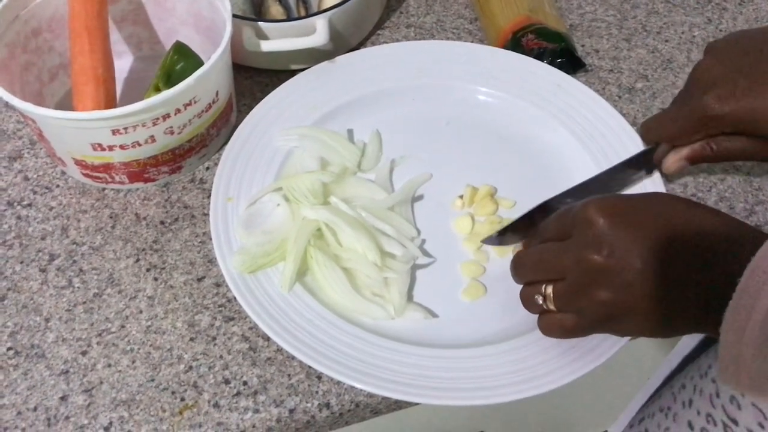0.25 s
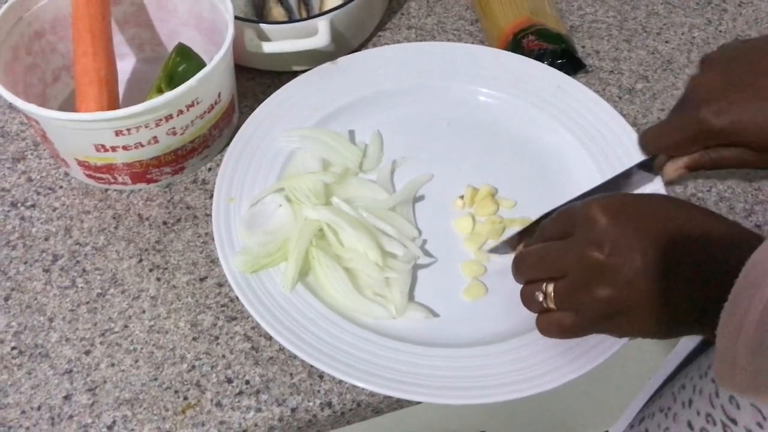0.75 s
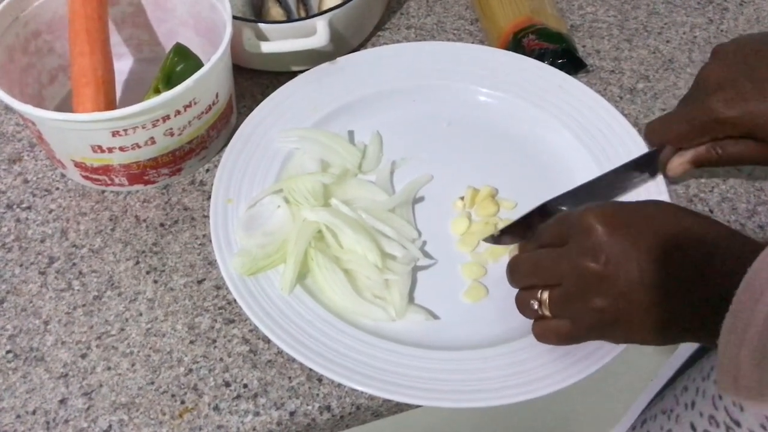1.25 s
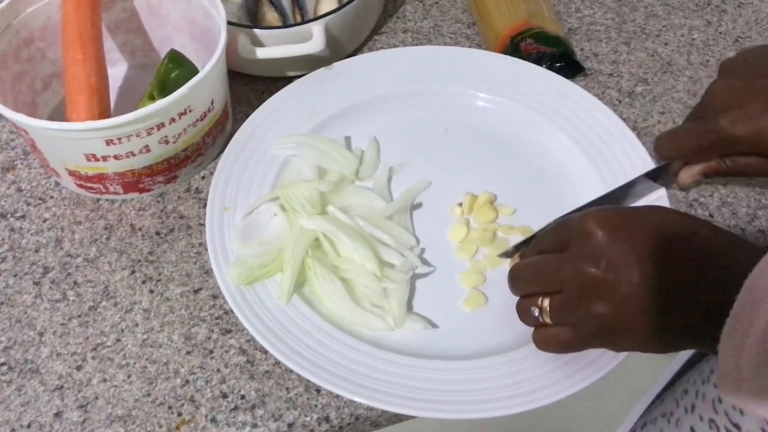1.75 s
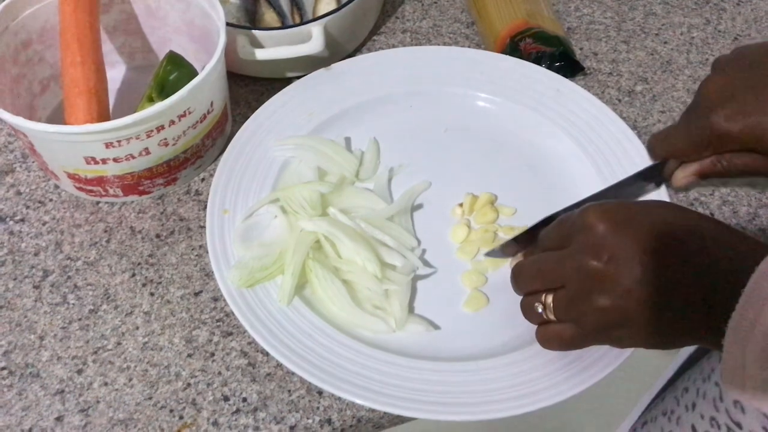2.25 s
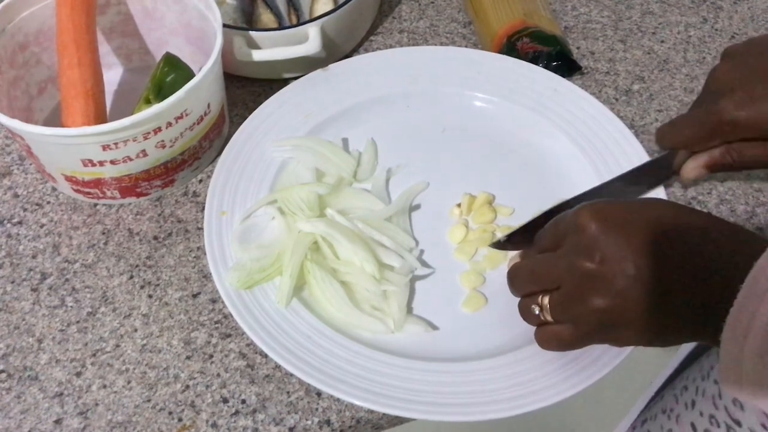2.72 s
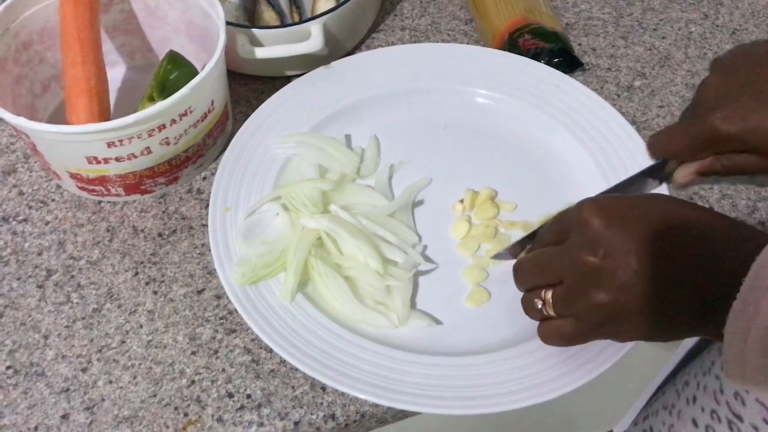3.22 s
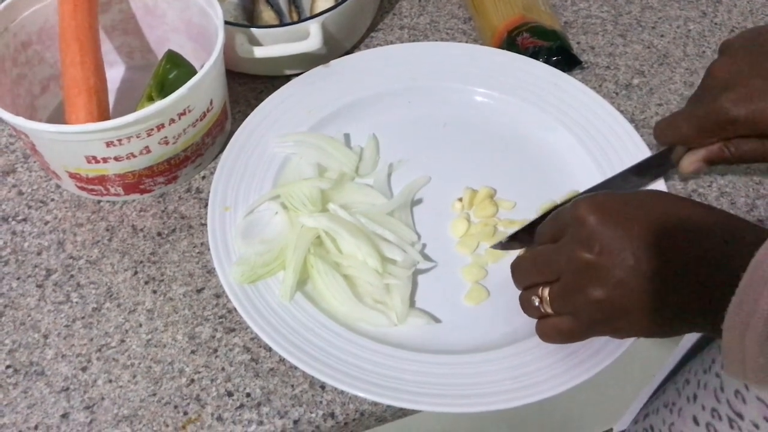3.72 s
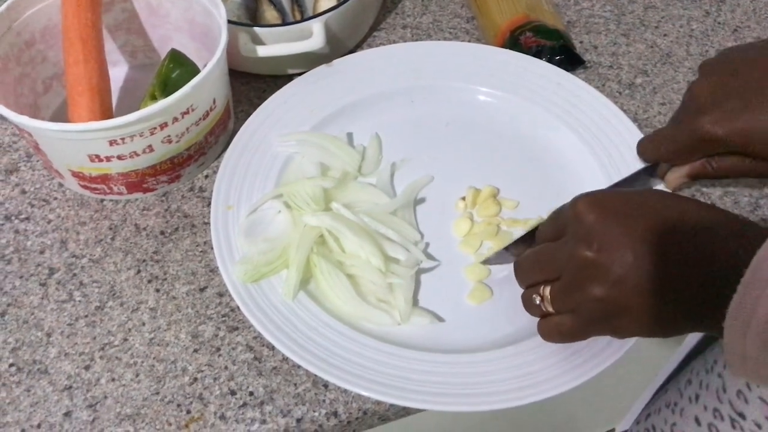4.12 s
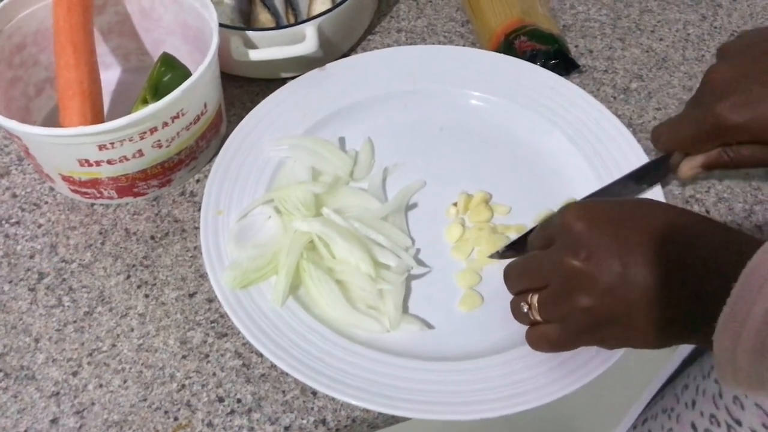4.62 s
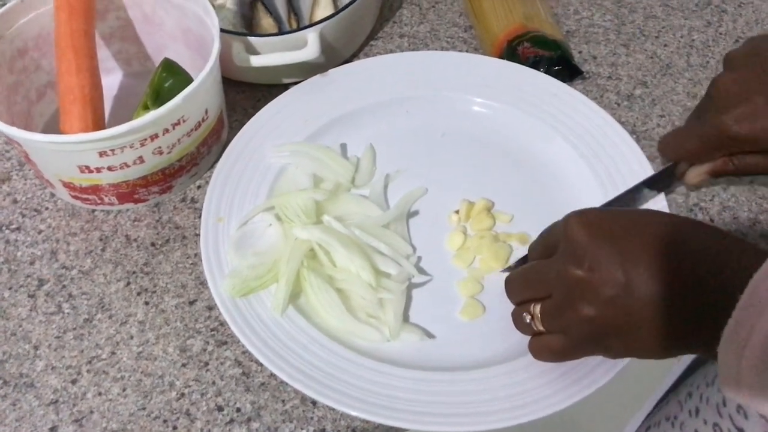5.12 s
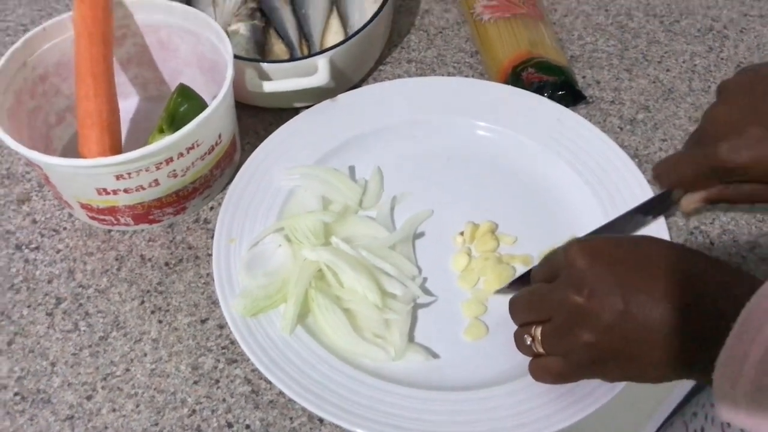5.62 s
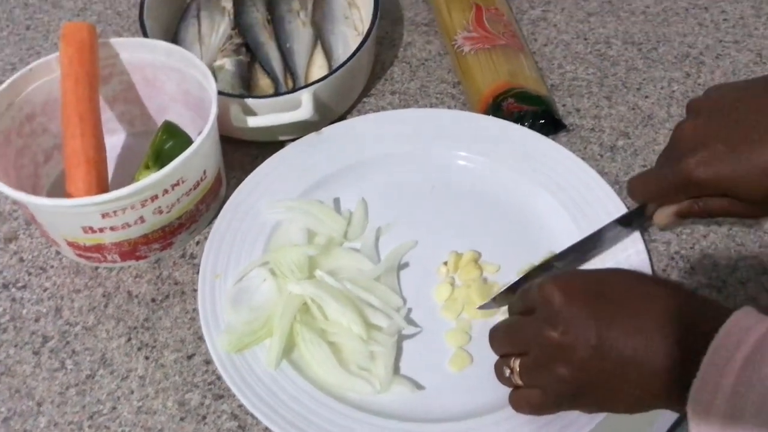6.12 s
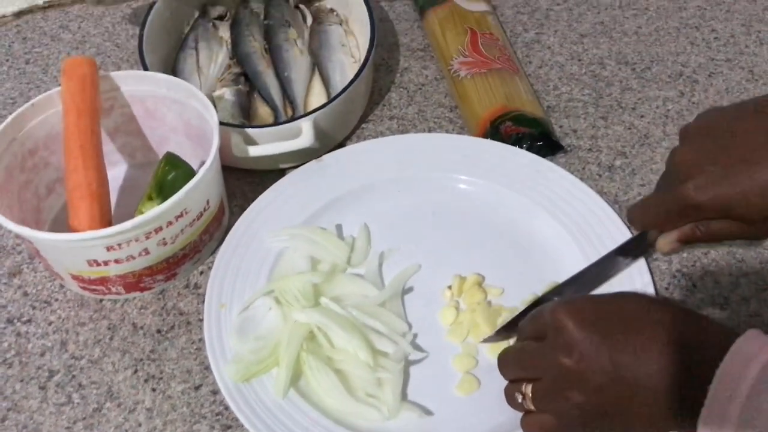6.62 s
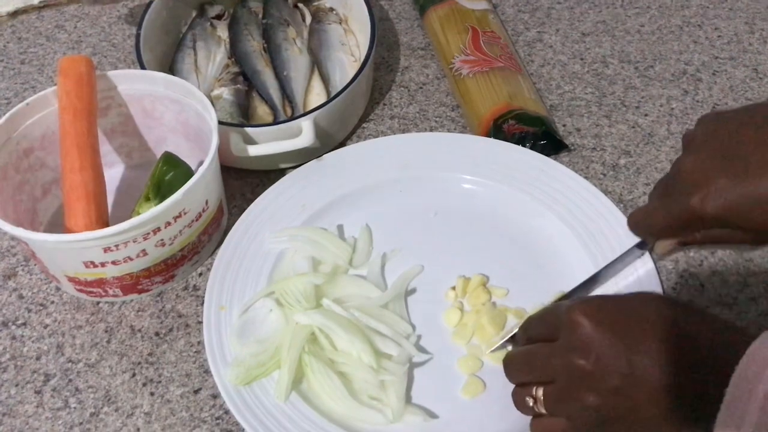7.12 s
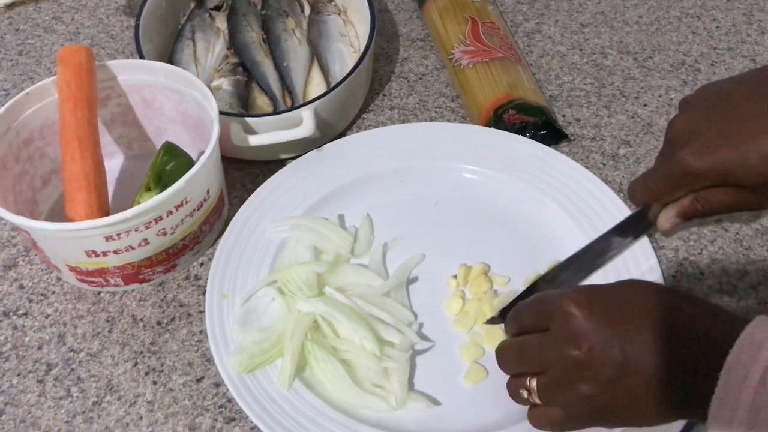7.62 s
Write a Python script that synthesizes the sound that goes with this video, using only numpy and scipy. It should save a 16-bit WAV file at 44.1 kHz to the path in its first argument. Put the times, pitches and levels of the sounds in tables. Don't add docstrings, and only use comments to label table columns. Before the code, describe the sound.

Spaced hard clinks of a blade striking a ceramic plate, soft garlic crunches before each, over low handling rumble and faint hiss.

```python
import sys
import numpy as np
from scipy import signal
from scipy.fft import rfft, irfft, next_fast_len
from scipy.io import wavfile
from scipy.ndimage import uniform_filter1d, map_coordinates

SR = 44100
rng = np.random.default_rng(int(sys.argv[2]) if len(sys.argv) > 2 else 0)


def gain_from_db(level_db):
    decades = np.asarray(level_db, float) / 20
    return 10 ** decades


def output_pcm(signal):
    pcm = np.clip(np.atleast_2d(signal).T, -1, 1) * 32767
    wavfile.write(sys.argv[1], SR, np.round(pcm).astype(np.int16))


N = 346626
LEAD = SR // 2


# start_s, peak_db, body_modes_db, top_over_high_modes_db (set by the spot struck)
BLOWS = [
    (0.6254, -14, 3, 3.5),
    (1.537, -8, -1.5, 3),
    (2.3448, -6, -1.5, 1),
    (3.0761, -11, 2, -5.5),
    (4.0453, -10.5, -0.9, -2),
    (4.8739, -7, -6.5, -10),
    (5.8146, -8, -3.5, -7.5),
    (6.81, -9.5, -2.5, 6.5),
]
# start_s, peak_db, body_modes_db, top_over_high_modes_db
EARLIER_BLOW = (-0.3921, -4, 0, 2)
# frequency_hz, level_db
CRACK = [(100, -14.5), (270, 4), (540, -17), (900, -2), (1350, -18.5), (4000, -11), (9000, -10.5),
         (13200, -5), (15000, -14.5), (16500, -13.5)]


def blows():
    near, far = np.zeros(LEAD + N), np.zeros(LEAD + N)
    t = np.arange(SR // 4) / SR
    for start_s, peak_db, body_db, spot_db in [EARLIER_BLOW, *BLOWS]:
        middle_db = 0.9 * body_db + 1.4
        high_db, top_db = -2 - spot_db / 2, 1 + spot_db / 2
        modes = ring([body_db, middle_db, 0, high_db, top_db], scatter_db=1.85)
        crack = gain_from_db(-9.5 - 60 * t / 0.027) * noise(CRACK, size=len(t))
        landing = (1 - np.exp(-t / 0.0005)) ** 2
        pressed = 0.29 + 0.46 / (1 + (t / 0.024) ** 4)
        hit = gain_from_db(peak_db - 2.5) * (modes + crack) * landing * pressed
        add(near, start_s - 0.0003, hit[0])
        to_walls = gain_from_db(1.5 - 60 * t / 0.17) * hit[1] + gain_from_db(peak_db - 14) * crack * landing
        add(far, start_s, echo(np.pad(to_walls, (0, SR))))
    return (near + gain_from_db(-6) * far)[LEAD:]


PLATE_HZ = [265, 410, 670, 800, 972, 1270, 1745, 1810, 2375, 2500, 2740, 2870, 3090, 3840, 4190, 4880, 6022,
            6100, 6268, 7628, 8210, 8550, 9045, 9272, 10530, 11545, 12216, 13050, 13480, 14078]
# level_to_camera_db, t60_s, extra_to_walls_db
PLATE = [(-21.5, 0.032, 5.5), (-15.5, .035, -0.5), (-20.5, 0.11, 3), (-16, 0.036, 7.5), (-9, 0.036, 1.5),
         (-32, 0.028, 5), (-9.5, 0.11, 4.5), (-23.5, 0.51, 3.5), (-13, .04, 2.5), (-17, 0.082, 2),
         (-20, 0.024, -5), (-5, 0.024, 3.3), (1.5, 0.039, -8.5), (-28, .07, 5.3), (-12, 0.035, -2.6),
         (-23.5, 0.067, -0.1), (-5, .08, -4.5), (-20.5, 0.14, 6), (-5, 0.065, -10), (-15.5, 0.15, -8.5),
         (5.5, 0.019, -9.5), (-14.5, 0.13, -1.9), (-17.5, .1, -4.5), (-18.5, .04, -6.5), (-15, 0.13, -7),
         (-4, 0.027, -4.5), (-11.5, 0.035, -2), (-8.5, 0.016, 2.5), (-14.5, .06, 2), (-17.5, 0.051, 0.3)]


def ring(group_db, scatter_db):
    t = np.arange(SR // 4) / SR
    hz = np.array(PLATE_HZ)[:, None]
    level_db, t60_s, wall_db = np.transpose(PLATE)[:, :, None]
    group = np.asarray(group_db)[np.searchsorted([2100, 5000, 10000, 12500], hz)]
    struck_db = level_db + group + scatter_db * rng.standard_normal(hz.shape)
    modes = gain_from_db(struck_db - 60 * t / t60_s) * np.sin(2 * np.pi * hz * t)
    return np.array([modes.sum(0), (gain_from_db(wall_db) * modes).sum(0)])


# frequency_hz, t60_s
KITCHEN = [(200, 1), (600, 0.81), (1800, 0.78), (3500, 0.74), (6000, 0.61), (10000, 0.47), (13500, 0.29),
           (16000, 0.18)]


def echo(x):
    hz, t, z = signal.stft(rng.standard_normal(SR), SR, nperseg=256)
    decay = gain_from_db(-60 * t / along(KITCHEN, hz)[:, None])
    tail = signal.istft(z * decay, SR, nperseg=256)[1]
    tail = tail * (1 - np.exp(-np.arange(len(tail)) / (SR * 0.001)))
    return signal.fftconvolve(x, tail / np.linalg.norm(tail))[:len(x)]


def cutting():
    hiss_gain, low_gain, middle_gain = pressure()
    near = tearing(hiss_gain) + rubbing(low_gain, middle_gain) + scraping(low_gain)
    near = near + skidding() + snapping() + biting()
    return near + gain_from_db(-11.5) * echo(near)


# start_s, length_s, hiss_db, rub_db, pressure_loss_db (along the stroke)
STROKES = [
    (0.404, 0.064, -64.5, -62.5, 15),
    (0.509, 0.095, -67, -63.5, -2),
    (0.864, 0.19, -70, -58.5, 7.5),
    (1.376, 0.11, -65, -58.5, 3),
    (2.245, 0.056, -65, -63, -2.5),
    (2.888, .18, -63.5, -54.5, 13),
    (3.768, 0.23, -68, -63.5, 4),
    (4.673, 0.16, -65.5, -59.5, 8),
    (5.616, 0.11, -66, -68, -5.5),
    (6.729, 0.074, -75, -90, 1.5),
]
# level_under_blow_db, growth_db_per_s
GIVE = [
    (-45, 602),
    (-49, 501),
    (-39.5, 1501),
]


def pressure():
    bite_db_s, lift_db_s = 901, 698
    lag_s = 0.012
    hiss, rub = 0, 0
    for start_s, length_s, hiss_db, rub_db, loss_db in STROKES:
        hiss = hiss + gain_from_db(hiss_db) * swell(start_s, length_s, bite_db_s, lift_db_s, 0.4 * loss_db)
        rub = rub + gain_from_db(rub_db) * swell(start_s + lag_s, length_s - lag_s, bite_db_s, lift_db_s, loss_db)
    give = []
    for under_db, growth_db_s in GIVE:
        give.append(sum(gain_from_db(blow[1] + under_db) * swell(blow[0] - 0.006, 0.004, growth_db_s, 20000)
                        for blow in BLOWS))
    middle = gain_from_db(-12) * rub + give[2] + gain_from_db(-6) * skid_gain()
    return hiss + give[0], rub + give[1], middle


# frequency_hz, level_db
FIBRE = [(1000, -26), (4000, -13), (8000, -12.5), (12000, -1.5), (14500, 0), (16000, -5)]


def tearing(gain):
    return gain * unit(gain_from_db(2 * wobble(270)) * noise(FIBRE))


def lower_modes():
    low = ring([-0.5, -41.5, -59.5, -59, -59], scatter_db=0)[1]
    middle = ring([-42, 3, -16, -19, -20.5], scatter_db=0)[1]
    return low, middle


def rubbing(low_gain, middle_gain):
    low, middle = lower_modes()
    force = gain_from_db(3 * wobble(54)) * rng.standard_normal(N)
    body_rub = unit(signal.fftconvolve(force, low)[:N])
    middle_rub = unit(signal.fftconvolve(force, middle)[:N])
    return gain_from_db(-6) * low_gain * body_rub + middle_gain * middle_rub


# start_s, peak_db
SNAPS = [(0.384, -47), (0.415, -50.5), (0.5095, -51.5), (0.5655, -44.5), (0.8444, -56), (0.9223, -48),
         (1.2136, -52), (1.3699, -46), (1.4078, -54), (1.8901, -47.5), (2.2523, -49), (2.582, -48.5),
         (2.8669, -54), (2.8802, -46), (2.8973, -55), (3.0091, -48.5), (3.7667, -59), (3.785, -54),
         (4.586, -47.5), (4.6839, -41.5), (5.5482, -50), (5.6228, -43), (7.2497, -47), (7.5985, -46),
         (7.6135, -51.5)]
# start_s, peak_db
LAST_FIBRES = [
    (1.514, -55.5),
    (3.053, -39),
    (4.028, -49.5),
    (5.784, -49.5),
    (6.780, -53.5),
]
# frequency_hz, level_db
SNAP = [(500, -24), (2000, -18.5), (6000, -7), (10000, -1.5), (14000, 0.5), (16500, 2.5)]


def snapping():
    out, t = np.zeros(LEAD + N), np.arange(SR // 4) / SR
    for start_s, peak_db in [*SNAPS, *LAST_FIBRES]:
        add(out, start_s - 0.0005, gain_from_db(peak_db - 3.5 - 60 * t / 0.008) * noise(SNAP, size=len(t)))
    return out[LEAD:]


# start_s, body_peak_db, middle_modes_db
BITES = [(0.405, -69, -18), (0.894, -53.5, 0), (0.934, -47, -3.5), (1.213, -58, -10), (1.388, -48, -21),
         (2.898, -40, -19), (3.055, -41, 0), (3.785, -50, -5), (4.685, -50, -17.5), (5.626, -54, -9.5),
         (7.614, -63, 0)]


def biting():
    low, middle = lower_modes()
    out, t = np.zeros(LEAD + N), np.arange(SR // 4) / SR
    for start_s, body_db, middle_db in BITES:
        tap = low / low.max() + gain_from_db(middle_db) * middle / middle.max()
        add(out, start_s, gain_from_db(body_db + 1) * tap)
        add(out, start_s, gain_from_db(body_db - 8 - 60 * t / 0.03) * noise(CRACK, size=len(t)))
    return out[LEAD:]


# frequency_hz, level_db
GRIT = [(200, -11.5), (450, -3.5), (1000, 0.5), (1400, -8), (2200, -16.5), (4000, -31.5)]


def scraping(low_gain):
    return gain_from_db(-5.5) * low_gain * unit(gain_from_db(1.2 * wobble(120)) * noise(GRIT))


# time_s, level_db
SKID = [
    (.885, -76.5),
    (.897, -56.5),
    (.93, -56.5),
    (.96, -56.5),
    (.985, -74),
]


def skid_gain():
    time_s, level_db = np.transpose(SKID)
    time_s = np.append(time_s, time_s[-1] + 0.006)
    level_db = np.append(level_db, level_db[-1])
    return gain_from_db(np.interp(np.arange(N) / SR, time_s, level_db, -140, -140))


def skidding():
    return skid_gain() * noise([(2500, -38.5), (2950, -5.5), (3100, 3.5), (3250, -14.5), (3700, -43)])


# start_s, held_s, level_db
GRIP = [(.19, 0.0076, -55), (.45, .07, -47.5), (.55, 0.027, -43.5), (1.03, 0.25, -46), (1.42, 0.24, -48.5),
        (1.95, 0.0097, -54.5), (2.19, .2, -52), (2.47, .06, -55.5), (2.82, .01, -53), (2.931, .02, -48.5),
        (3.08, 0.15, -54.5), (3.52, .01, -61), (3.8, 0.092, -53), (4.05, 0.12, -54.5), (4.44, 0.021, -58),
        (4.72, 0.15, -51), (4.86, 0.052, -53.5), (5.04, 0.086, -56), (5.191, 0.034, -44.5),
        (5.39, .04, -45.5), (5.5, 0.26, -49), (5.94, 0.21, -47), (6.44, .01, -52), (6.59, 0.019, -50.5),
        (6.849, .02, -50), (7.1, 0.17, -63), (7.39, 0.017, -63), (7.6, 0.23, -65)]
# frequency_hz, density_db (per Hz)
RUMBLE = [(12, -42.5), (20, -18.5), (35, -15), (59, 5), (130, -3), (269, -18), (420, -25), (500, -32),
          (650, -64.5), (1100, -120)]
# start_s, peak_db, pitch_hz
BUMPS = [(0.186, -27, 149), (0.45, -28, 135), (1.08, -27.5, 137.6), (2.175, -32, 94.2),
         (4.453, -29.5, 145.5), (4.846, -34.5, 120.7), (5.169, -39, 102), (5.245, -27, 139.4),
         (5.401, -32.5, 140), (6.058, -32.5, 127.4), (6.118, -33.5, 130), (6.165, -30.5, 118.6),
         (6.421, -40, 92), (6.558, -34.5, 128.5), (7.366, -36.5, 150.6), (7.697, -39.5, 266)]


def handling():
    squeeze_db_s, relax_db_s = 249, 115
    grip = gain_from_db(-61)
    for start_s, held_s, level_db in GRIP:
        grip = grip + gain_from_db(level_db) * swell(start_s, held_s, squeeze_db_s, relax_db_s)
    lumps = gain_from_db(2.2 * wobble(28)) * noise(RUMBLE)
    evened = lumps / np.sqrt(np.abs(uniform_filter1d(lumps ** 2, size=SR // 6)) + 0.05)
    out, t = np.zeros(LEAD + N), np.arange(SR // 8) / SR
    for start_s, peak_db, hz in BUMPS:
        u = t * hz / 0.42
        add(out, start_s + 0.007, gain_from_db(peak_db) * u * np.exp(-u) * np.sin(2 * np.pi * hz * t))
    return gain_from_db(-5.5) * grip * evened + out[LEAD:]


# frequency_hz, density_db (per Hz)
FLOOR = [(88, -46), (150, -13.5), (264, -13), (422, -15.5), (524, -19), (888, -20), (1420, -25.5),
         (1790, -24.5), (2310, -27.5), (12400, -34.5), (16000, -30.5)]


def camera():
    sway_db = 0.7 * wobble(3)
    tone = gain_from_db(-67.5 + sway_db) * noise(FLOOR)
    fridge = gain_from_db(-81.5) * noise([(580, -40), (640, -3), (660, -1), (730, -39)])
    buzz_spectrum = [(8000, -39.5), (10500, -11), (12000, -0.5), (14000, -4.5), (16000, -21)]
    buzz = gain_from_db(-77.5 + 1.7 * wobble(170)) * noise(buzz_spectrum)
    tick_spectrum = [(6000, -36), (11000, -1.5), (14500, -10), (16500, -12.5)]
    out, t = np.zeros(LEAD + N), np.arange(SR // 100) / SR
    for start_s in 0.2572 + 0.3 * np.arange(26):
        for lag_s, peak_db in ((0, -56), (0.005, -59)):
            tick = gain_from_db(peak_db - 60 * t / 0.0045) * noise(tick_spectrum, size=len(t))
            add(out, start_s + lag_s, tick)
    return tone + fridge + buzz + out[LEAD:]


def swell(s, held_s, rise_db_s, fall_db_s, sag_db=0):
    t = np.arange(N) / SR - s
    rise_db = rise_db_s * np.minimum(t, 0)
    held_db = -sag_db * np.clip(t / held_s, 0, 1)
    fall_db = -fall_db_s * np.maximum(t - held_s, 0)
    return gain_from_db(rise_db + held_db + fall_db)


def wobble(rate):
    knots = rng.standard_normal(int(N * rate / SR) + 4)
    return map_coordinates(knots, [np.arange(N) * rate / SR])


def noise(spectrum, size=N):
    return unit(filtered(rng.standard_normal(size), lambda hz: gain_from_db(along(spectrum, hz))))


def filtered(x, response):
    m = next_fast_len(len(x) + 8192)
    return irfft(rfft(x, m) * response(np.fft.rfftfreq(m, 1 / SR)), m)[:len(x)]


def along(points, hz):
    f, v = np.transpose(points)
    return np.interp(np.log(hz + 1), np.log(f + 1), v)


def unit(x):
    return x / np.sqrt(np.mean(x ** 2) + 1e-20)


def add(track, s, sound):
    part = track[LEAD + round(s * SR):][:len(sound)]
    part += sound[:len(part)]


def scene():
    return (blows() + cutting() + handling() + camera())[None]


def band_limit(x):
    return signal.sosfilt(signal.butter(12, 16810, fs=SR, output="sos"), x)


# frequency_hz, level_db
BAND_LIMIT = [(14000, 0), (15700, 2), (15780, -8), (16550, -11), (16820, -50)]


def record(dry):
    turn_hz, width_hz = 3080, 38

    def response(hz):
        ahead = 1 - 0.66 / (1 - 1j * (hz - turn_hz) / width_hz)
        return ahead * gain_from_db(along(BAND_LIMIT, hz))

    mix = filtered(dry[0], response)[None]
    return band_limit(mix)


dry = scene()
out = record(dry)
output_pcm(out)
```